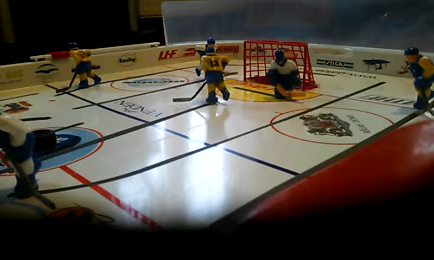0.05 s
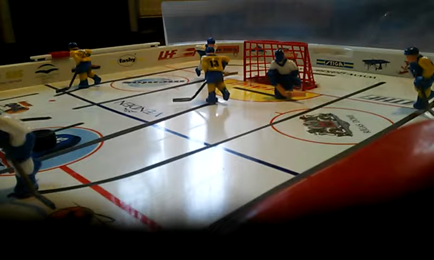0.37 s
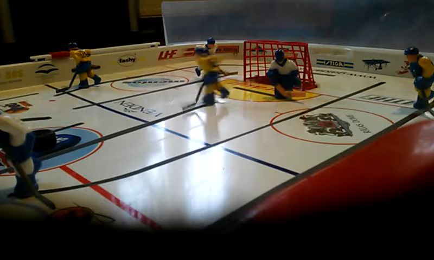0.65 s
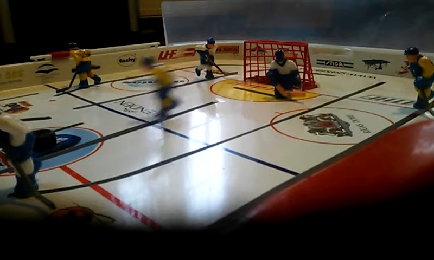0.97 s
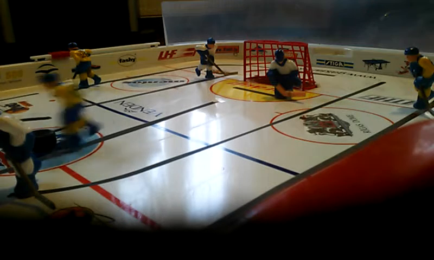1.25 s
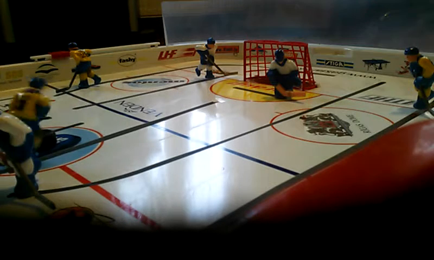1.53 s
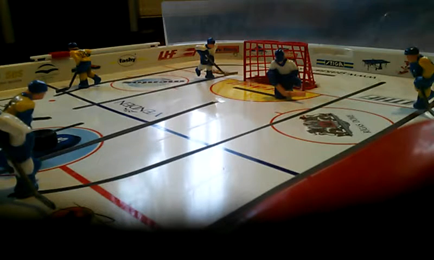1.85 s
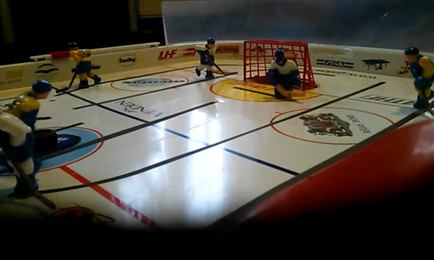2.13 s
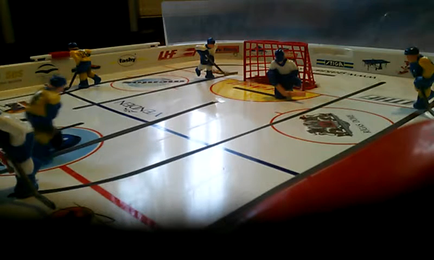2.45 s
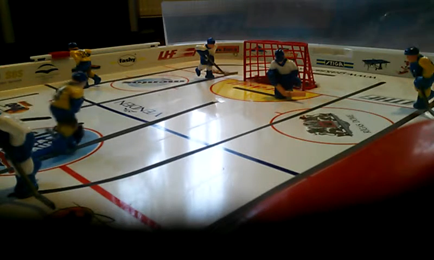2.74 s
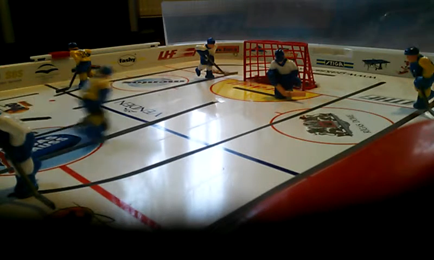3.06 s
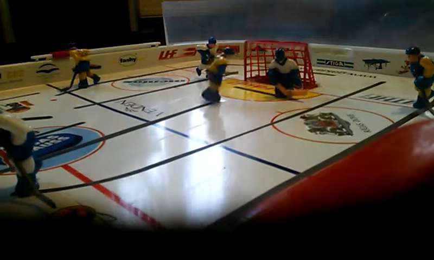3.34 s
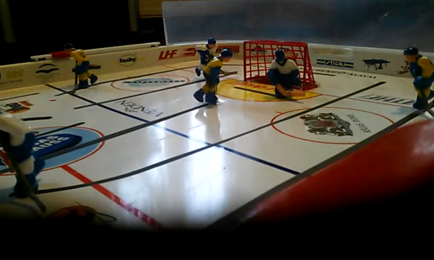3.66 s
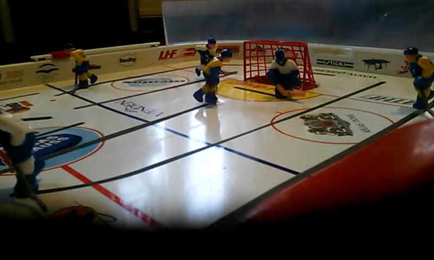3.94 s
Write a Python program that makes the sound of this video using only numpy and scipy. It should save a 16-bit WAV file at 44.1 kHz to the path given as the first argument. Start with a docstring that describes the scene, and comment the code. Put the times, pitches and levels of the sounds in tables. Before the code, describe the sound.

In a small room, a table hockey player rubs and ticks softly along its track. Its rod gives a short squeak and a few scrapes, then the figure slides again and hits the end with a loud plastic knock.

```python
"""A plastic table hockey figure slides and clicks along its slot, then knocks hard against the goal end
and rattles. Friction drives it into sound as it is drawn back and pushed forward; in between, its rod
scrapes and squeaks by stick-slip as it turns. Rubbing and knocks excite the modes of the hollow rink.
A small room reverberates, over faint room tone and microphone hiss."""
import sys
import numpy as np
from scipy import signal
from scipy.io import wavfile
from scipy.ndimage import uniform_filter1d

SR = 44100
rng = np.random.default_rng(int(sys.argv[2]) if len(sys.argv) > 2 else 0)


def unload_wav(signal):
    """Save mono or channel-first audio to the path in sys.argv[1] as 16-bit WAV at rate SR, clipped to [-1, 1]."""
    wavfile.write(
        sys.argv[1],
        SR,
        np.round(np.clip(np.atleast_2d(signal).T, -1, 1) * 32767).astype(np.int16),
    )


N = 176400
CONTACT_S = 0.0007  # rise time of an impact


def amp(db):
    """Amplitude ratio of a level in decibels."""
    return 10 ** (np.asarray(db) / 20)


def unit(x):
    """Normalisation to unit rms."""
    return x / np.sqrt(np.mean(x ** 2) + 1e-20)


def at_frequency(points, hz):
    """Interpolation on a logarithmic frequency axis."""
    f, value = np.transpose(points)
    return np.interp(np.log(hz + 1), np.log(f), value)


def curve(points, column=1):
    """Linear interpolation of a time table at every sample."""
    rows = np.array(points)
    return np.interp(np.arange(N) / SR, rows[:, 0], rows[:, column])


def add(mix, onset, sound):
    """Superposition of a sound on the mix, from an onset in seconds."""
    part = mix[max(round(onset * SR), 0):][:len(sound)]
    part += sound[:len(part)]


def colour(x, spectrum, tilt_db=0, size=4096):
    """Minimum-phase filtering at unit energy, with a tilt per octave from 500 to 6000 Hz."""
    hz = abs(np.fft.fftfreq(size, 1 / SR))
    gain = unit(amp(at_frequency(spectrum, hz) + tilt_db * np.log2(np.clip(hz, 500, 6000))))
    log_response = np.conj(signal.hilbert(np.log(gain + 1e-6)))
    taps = np.fft.ifft(np.exp(log_response)).real
    return signal.fftconvolve(x, taps[:size // 2])[:len(x)]


def decay(t, t60):
    """Exponential damping: 60 dB in t60 seconds."""
    return np.exp(-np.log(1000) * t / t60)


def attack(t, rise_s=CONTACT_S):
    """Exponential build-up to full amplitude."""
    return 1 - np.exp(-t / rise_s)


# Reverberation time of the room: f/Hz, T60/s
ROOM_T60 = [(80, 0.4), (300, 0.38), (1000, 0.38), (2500, 0.37), (5500, 0.31), (14000, 0.4)]
def room_tail():
    """Diffuse field: dense reflections form a noise in which each band decays at its own rate."""
    hz, t, bands = signal.stft(rng.standard_normal(SR), SR, nperseg=256)
    bands = bands * decay(t, at_frequency(ROOM_T60, hz)[:, None])
    return signal.istft(bands, SR)[1][:SR] * attack(np.arange(SR) / SR, rise_s=0.0031)


def reverberate(x, wet_db):
    """Convolution with the room's response; direct and reverberant sound share the original power."""
    wet = signal.fftconvolve(x, unit(room_tail()) / np.sqrt(SR))[:len(x)]
    return (x + amp(wet_db) * wet) / np.hypot(1, amp(wet_db))


def friction(slips_per_s=2500, spread_db=2.5, lumps_per_s=80, lump_db=4):
    """Sliding friction: tiny random impulses, swelling in lumps as the foot catches and lets go."""
    sizes = amp(spread_db * np.minimum(rng.exponential(1, N), 4))
    lumps = np.interp(np.arange(N) / SR * lumps_per_s, np.arange(SR), rng.uniform(-2.1, 2.0, SR))
    impulses = rng.choice([-1, 1], N) * (rng.random(N) < slips_per_s / SR)
    return unit(sizes * amp(lump_db * lumps) * impulses)


# Modes of the hollow rink: f/Hz, level/dB
RINK_MODES = [(104, -17.5), (176, -8.5), (198, -19.5), (300, -4), (339, -9), (509, 0.5), (581, 0),
              (624, 1.5), (763, -0.5), (966, 4.5), (1039, 5.5), (1081, 4), (1126, -2), (1223, -1.5),
              (1304, 2.5), (1341, 3.5), (1607, -3.5), (1693, 0.5), (1748, 0.5), (1785, -2), (2143, 2.5),
              (2493, -2), (2612, -7), (4012, -11), (5786, -14.5)]
def rink_ring(t60=0.23):
    """Free vibration: the rink's normal modes, in random phase and equally damped."""
    t = np.arange(SR) / SR
    modes = sum(amp(db) * np.sin(2 * np.pi * (hz * t + rng.random())) for hz, db in RINK_MODES)
    return unit(modes) * decay(t, t60) * attack(t)


# Strength of the friction: t/s, relative level/dB
SLIDE_LEVEL = [(0, -48), (.08, -59.5), (.15, -70), (.3, -78), (.55, -75.5), (.59, -63), (.72, -62),
               (.79, -51.5), (.93, -55), (1.02, -55.5), (1.15, -51.5), (1.25, -58.5), (1.36, -63.5),
               (1.47, -60), (1.6, -60), (1.74, -62.5), (1.88, -58.5), (1.96, -73), (2.23, -78), (2.33, -63),
               (2.5, -69), (2.58, -62), (2.75, -53.5), (2.85, -73), (2.93, -63.5), (3.02, -62),
               (3.14, -73.5), (3.21, -63.5), (3.3, -50), (3.385, -33), (3.42, -49.5), (3.7, -59.5),
               (3.85, -61), (4, -68)]
# Spectrum of the rubbing: f/Hz, level/dB
SLIDE_SPECTRUM = [(50, -32.5), (110, -15.5), (170, -10.5), (230, -9), (340, -9), (450, 0.5), (600, -4.5),
                  (760, -3), (860, -2), (1050, -7), (1250, -4.5), (1620, -2.5), (1900, -12.5), (2130, -5.5),
                  (2350, -11), (2560, -9.5), (2800, -22.5), (3100, -11.5), (3700, -17), (4600, -18.5),
                  (5500, -21), (6800, -29.5), (10000, -59), (16000, -57)]
def slide(gain_db=-2, ring_db=-7.5):
    """Forced vibration: the figure's foot rubs along the slot and drives the rink's modes."""
    slips = friction() * amp(gain_db + curve(SLIDE_LEVEL))
    ring = signal.fftconvolve(slips, unit(rink_ring()) / np.sqrt(SR))[:N]
    return reverberate(colour(slips, SLIDE_SPECTRUM) + amp(ring_db) * ring, wet_db=-4)


# Resonances excited by sliding: t/s, duration/s, start f/Hz, end f/Hz, pole bandwidth/Hz, level/dB
RESONANCES = [(0, .12, 490, 490, 60, -57), (0, .125, 1650, 1650, 200, -58),
              (0.5, 0.34, 2560, 2460, 280, -66), (.89, .42, 775, 772, 10, -58),
              (0.908, 0.065, 4750, 4400, 600, -62), (0.912, 0.078, 450, 425, 16, -56),
              (1.112, 0.052, 1660, 1690, 170, -51.5), (1.113, .15, 2956, 2956, 110, -67),
              (1.118, 0.05, 2540, 2620, 140, -55), (1.718, 0.1, 741, 710, 87, -59.5),
              (1.83, 0.077, 590, 590, 300, -61), (2.6, 0.17, 746, 746, 68, -63.5),
              (2.724, 0.066, 2580, 2580, 1600, -58), (2.985, 0.07, 750, 760, 21, -58),
              (3.165, .19, 3070, 3070, 83, -68), (3.363, 0.018, 3070, 3150, 250, -40)]
def singing():
    """Resonance under random forcing: bands of noise sing out, some gliding in pitch."""
    out = np.zeros(N)
    for onset, duration, start_hz, end_hz, width_hz, db in RESONANCES:
        pole = np.exp(-np.pi * width_hz / SR)
        drive = rng.standard_normal(SR) + 1j * rng.standard_normal(SR)
        envelope = signal.lfilter([1], np.poly([pole, pole]), drive)[-int(duration * SR):]
        cycles = np.cumsum(np.linspace(start_hz, end_hz, len(envelope))) / SR
        band = (envelope * np.exp(2j * np.pi * cycles)).real
        add(out, onset, amp(db) * unit(band) * signal.windows.tukey(len(band), 0.5))
    return reverberate(out, wet_db=-6.5)


# Spectrum of the microphone hiss: f/Hz, level/dB
HISS_SPECTRUM = [(30, -42), (1000, -14), (3000, 0), (5000, -6), (7500, 0.5), (10000, -1), (15500, 3)]
# Envelope of the hiss: t/s, level/dB
HISS_LEVEL = [(0, -62.5), (.45, -66), (.8, -61.5), (1.22, -64), (1.35, -71), (1.65, -69.5), (1.98, -77.5),
              (2.08, -66), (2.22, -75.5), (2.35, -70.5), (2.6, -73), (2.75, -65.5), (2.95, -73.5),
              (3.25, -77.5), (3.33, -62.5), (3.75, -72), (4, -73)]
def hiss(first_tick_s=0.132, tick_period_s=0.6415, tick_db=-56):
    """Broadband noise: microphone hiss of varying level, with faint periodic treble ticks."""
    out = colour(rng.standard_normal(N), HISS_SPECTRUM) * amp(curve(HISS_LEVEL))
    t = np.arange(SR // 10) / SR
    highpass = signal.butter(2, 8600, "high", fs=SR)
    for onset in np.arange(first_tick_s, N / SR, tick_period_s):
        tick = rng.standard_normal(len(t)) * decay(t, t60=0.016)
        add(out, onset, amp(tick_db) * signal.lfilter(*highpass, tick))
    return out


# Spectrum of the room tone: f/Hz, level/dB
AIR_SPECTRUM = [(20, 5.5), (60, -28), (150, 7.5), (300, -1.5), (1000, -1), (2500, -8), (6000, -8.5),
                (16000, -48)]
def room_tone(level_db=-74.5):
    """Stationary noise: the room's ambient floor."""
    return amp(level_db) * colour(rng.standard_normal(N), AIR_SPECTRUM)


def impact(t60, crack, room_db):
    """Impulse response: a contact spike, the dense damped ring of plastic, and the room's tail."""
    t = np.arange(SR) / SR
    ring = rng.standard_normal(SR) * decay(t, t60) * attack(t)
    ring[round(CONTACT_S * SR)] += crack * np.linalg.norm(ring)
    return ring + amp(room_db) * room_tail()


# Taps in the slot: t/s, level/dB, tilt/(dB per octave), T60/s, room level/dB, cutoff f/Hz
SLOT_TAPS = [(0.162, -38, -2, 0.033, -4, 2600), (0.736, -53, -2, 0.042, -6, 2550),
             (0.775, -49, -6, 0.05, -4.5, 6000), (0.818, -47.5, -1.5, 0.025, -13, 6100),
             (0.858, -50, -3.5, 0.023, -5.5, 3000), (0.885, -46.5, -4.5, 0.028, -4.5, 5000),
             (0.92, -48, 1.5, 0.07, -22, 6000), (1.054, -47, 0.5, 0.14, -5.5, 6000),
             (1.096, -40, -4, 0.016, -13.5, 4000), (1.117, -43, 0.5, 0.055, -11.5, 3200),
             (1.142, -49, -1, 0.044, -14, 3000), (1.702, -46, -5, .016, -16.5, 2500),
             (1.798, -43, 3, 0.023, -10, 7070), (2.4559, -36.5, 0, 0.033, -15, 8000),
             (2.885, -49.5, 1.5, 0.012, -13.5, 6000), (2.96, -53, -2, .025, -15, 2520),
             (3.029, -40.5, -1.5, 0.039, -15, 7800), (3.222, -47, -0.5, 0.044, -6, 6000),
             (3.3255, -32, -1, 0.015, -24, 3500), (3.887, -53, -5, 0.031, -20, 3000),
             (3.968, -44.5, 0, 0.039, -10.5, 2800), (3.983, -46, -10, 0.096, -6, 2510)]
# Spectrum of a tap: f/Hz, level/dB
TAP_SPECTRUM = [(50, -39.5), (160, -13), (270, -16), (420, -1.5), (620, 2), (1000, 0), (1300, 1),
                (1600, 2.5), (1950, -0.5), (2500, -1), (3200, -13), (4200, -18.5), (5400, -10),
                (6800, -38.5), (16000, -42)]
def clicks():
    """Light impacts: the loose figure taps the sides of its slot, some taps dull, some bright."""
    out = np.zeros(N)
    for onset, db, tilt_db, t60, room_db, cutoff_hz in SLOT_TAPS:
        tap = colour(impact(t60, crack=0.13, room_db=room_db), TAP_SPECTRUM, tilt_db)
        lowpass = signal.butter(2, cutoff_hz, fs=SR)
        add(out, onset, amp(db) * signal.lfilter(*lowpass, tap))
    return out


# Modes of parts struck in some clicks: t/s, level/dB, f/Hz, T60/s
PART_MODES = [(.162, -33, 1560, 0.053), (.162, -34, 1680, 0.048), (.1625, -35.5, 995, 0.07),
              (.1625, -37.5, 2340, 0.04), (0.1627, -43, 474, 0.24), (.819, -42, 3500, 0.017),
              (.858, -42, 930, 0.053), (1.056, -38, 1010, 0.044), (1.799, -34.5, 3550, 0.024),
              (1.799, -50, 725, 0.11), (1.799, -47.5, 1736, 0.09), (1.801, -46.5, 1270, 0.065),
              (2.455, -51.5, 5520, 0.02)]
def pings():
    """Damped harmonic oscillation: struck parts ring briefly as decaying sinusoids."""
    out, t = np.zeros(N), np.arange(SR) / SR
    for onset, db, hz, t60 in PART_MODES:
        ring = np.sin(2 * np.pi * hz * t) * decay(t, t60) * attack(t)
        add(out, onset, amp(db) * reverberate(ring, wet_db=-7))
    return out


# Course of the rod's squeak: t/s, f/Hz, relative level/dB
SQUEAK_PATH = [(1.35, 452, -98), (1.37, 441, -64), (1.538, 436, -58.5), (1.6, 411.8, -43.5),
               (1.64, 411, -67), (1.668, 435.4, -53), (1.712, 425, -81), (1.756, 431, -56.5),
               (1.82, 464, -79)]
# Partials of the squeak: harmonic number, level/dB
SQUEAK_HARMONICS = [(1, 0.5), (2, -9.5), (3, -8.5)]
def rod_squeak(jitter=0.014, gain_db=-0.5):
    """Stick-slip oscillation: the turning rod gives a low harmonic tone of unsteady pitch."""
    t = np.arange(N) / SR
    wobble = unit(uniform_filter1d(rng.standard_normal(N), size=300))
    cycles = np.cumsum(curve(SQUEAK_PATH) * (1 + jitter * wobble)) / SR
    sounding = (t > SQUEAK_PATH[0][0]) & (t < SQUEAK_PATH[-1][0])
    envelope = amp(gain_db + curve(SQUEAK_PATH, column=2)) * sounding
    return envelope * sum(amp(db) * np.sin(2 * np.pi * k * cycles) for k, db in SQUEAK_HARMONICS)


# Rod strokes: t/s, duration/s, level/dB, tilt/(dB per octave), frequency ratio, ramp/s, room level/dB
ROD_STROKES = [(1.508, 0.058, -43.5, -1, 0.95, 0.0089, 1.5), (1.522, 0.0077, -37, 1.5, 0.97, 0.002, -3),
               (1.658, 0.088, -56.5, -5, 1.01, 0.021, -3), (1.699, 0.013, -49, -4.5, 1.07, 0.0016, 0),
               (2.017, 0.053, -46, 0.5, .98, 0.015, -2), (2.262, 0.046, -52.5, -9, 0.97, 0.025, -6),
               (2.375, 0.022, -49.5, -6, 1.04, 0.005, -0.5), (2.489, 0.032, -52, -9.5, 1.08, 0.0083, -5),
               (2.714, 0.11, -58.5, -1, 1.01, 0.012, 2), (2.867, 0.032, -56.5, -5.5, 1.02, 0.017, -6)]
# Spectrum of the rod in its guide: f/Hz, level/dB
ROD_SPECTRUM = [(100, -31), (600, -23), (720, -19.5), (810, -6), (900, 4), (1060, 1), (1300, -20),
                (1550, -18), (1850, -19), (2100, 0), (2350, -1.5), (2750, -13.5), (3400, -11), (4000, -13),
                (4700, -9), (5700, -15), (7500, -30), (15000, -52)]
def rod_scrapes(sag_db=-8):
    """Friction noise shaped by resonances: short hollow scrapes of the rod, each weakening as it goes."""
    out, t = np.zeros(N), np.arange(SR // 2) / SR
    for onset, duration, db, tilt_db, ratio, ramp_s, room_db in ROD_STROKES:
        ramps = np.clip(np.minimum(t, duration - t) / ramp_s, 0, 1)
        sag = amp(sag_db * (np.minimum(t / duration, 1) - 0.5))
        spectrum = np.array(ROD_SPECTRUM) * [ratio, 1]
        scrape = colour(ramps * sag * rng.standard_normal(len(t)), spectrum, tilt_db)
        add(out, onset, amp(db) * reverberate(scrape, room_db))
    return out


# Collisions at the goal end: t/s, relative level/dB, tilt/(dB per octave)
GOAL_KNOCKS = [(3.346, -40.5, -7), (3.3633, -22.5, -6), (3.3945, 1, -3.5), (3.3992, -7, 3.5),
               (3.4155, -6.5, 1.5), (3.4192, -6, 2.5), (3.531, -26, -5), (3.545, -21, -5.5),
               (3.659, -33, -3)]
# Spectrum of a knock: f/Hz, level/dB
KNOCK_SPECTRUM = [(30, -39.5), (55, -48), (105, -15.5), (130, -18), (175, -16), (245, -16), (310, -9),
                  (420, -6.5), (560, -3), (800, -2), (1300, 3), (1750, 2), (2250, -1), (2800, -7),
                  (4000, -10.5), (5600, -16), (7500, -31.5), (10500, -44), (16000, -48)]
def knocks(gain_db=-9, ring_db=-9):
    """Impulsive excitation: the figure hits the end of the slot and rebounds, ringing the rink."""
    out = np.zeros(N)
    for onset, db, tilt_db in GOAL_KNOCKS:
        hit = colour(impact(t60=0.046, crack=0.39, room_db=-9), KNOCK_SPECTRUM, tilt_db)
        add(out, onset, amp(gain_db + db) * (hit + amp(ring_db) * rink_ring()))
    return out


def scene():
    """Linear superposition of all sources at one microphone."""
    sustained = slide() + singing() + hiss() + room_tone()
    return (sustained + clicks() + pings() + rod_squeak() + rod_scrapes() + knocks())[None]


def record(dry, low_cut_hz=62, band_limit_hz=15900):
    """Band limiting: a high-pass that removes the deep bass, and the recorder's steep low-pass."""
    highpass = signal.butter(3, low_cut_hz, "high", fs=SR, output="sos")
    lowpass = signal.firwin(511, band_limit_hz, window=("kaiser", 9), fs=SR)
    return signal.oaconvolve(signal.sosfilt(highpass, dry), lowpass[None], "same")


dry = scene()
out = record(dry)
unload_wav(out)
```